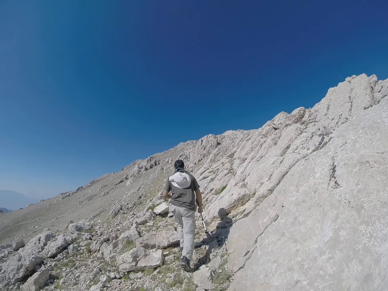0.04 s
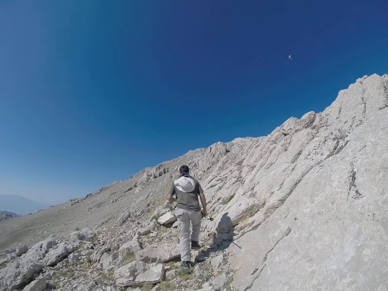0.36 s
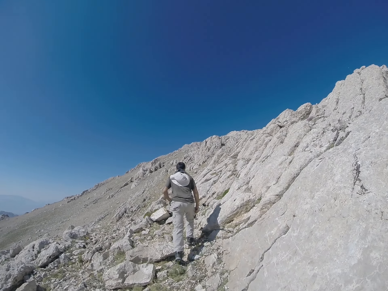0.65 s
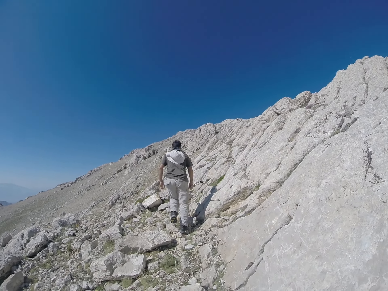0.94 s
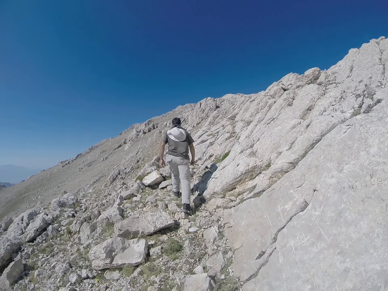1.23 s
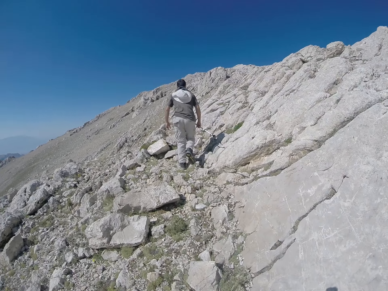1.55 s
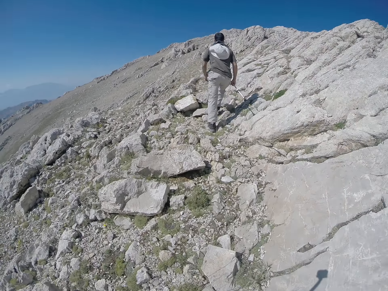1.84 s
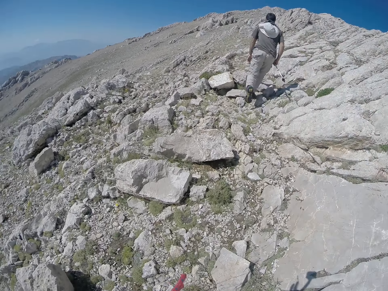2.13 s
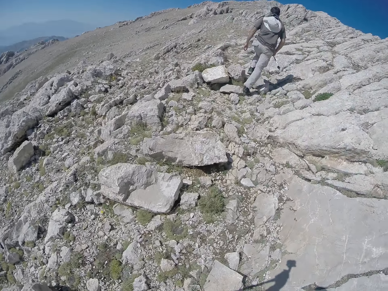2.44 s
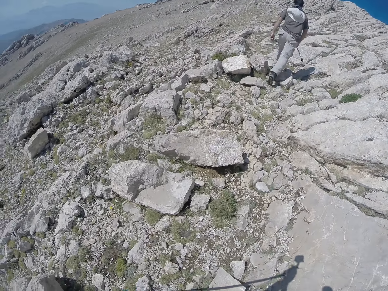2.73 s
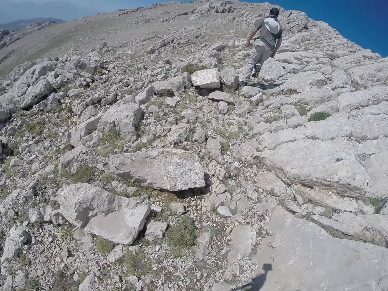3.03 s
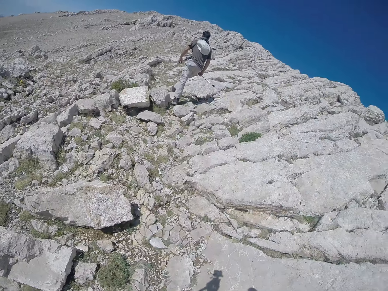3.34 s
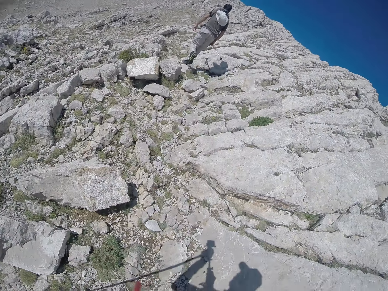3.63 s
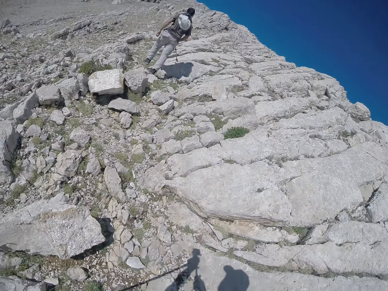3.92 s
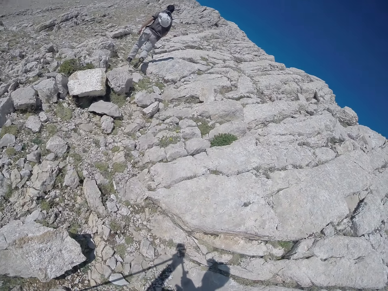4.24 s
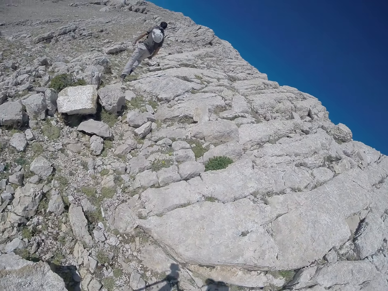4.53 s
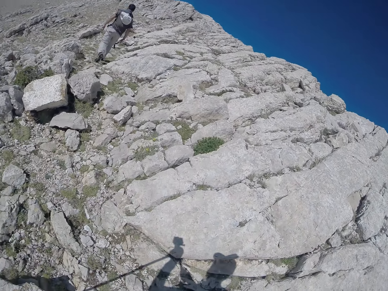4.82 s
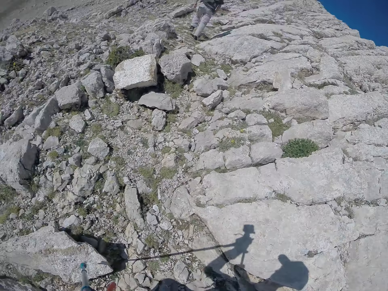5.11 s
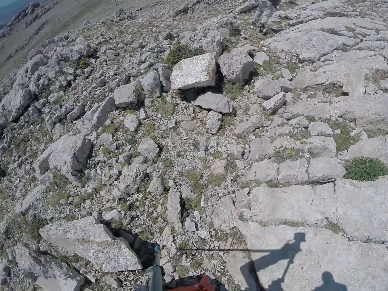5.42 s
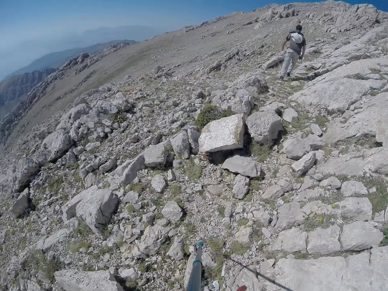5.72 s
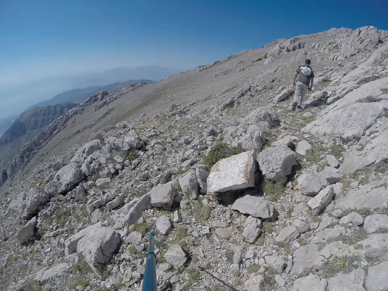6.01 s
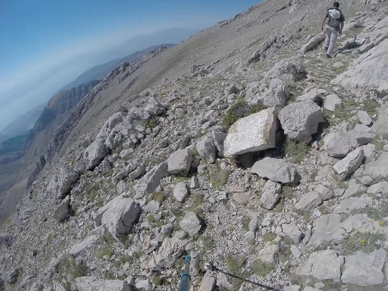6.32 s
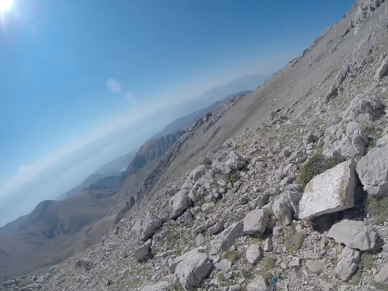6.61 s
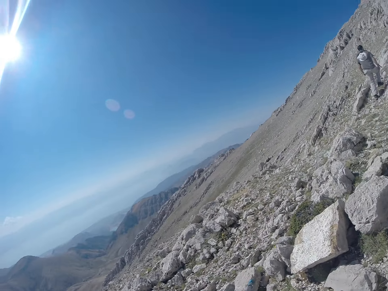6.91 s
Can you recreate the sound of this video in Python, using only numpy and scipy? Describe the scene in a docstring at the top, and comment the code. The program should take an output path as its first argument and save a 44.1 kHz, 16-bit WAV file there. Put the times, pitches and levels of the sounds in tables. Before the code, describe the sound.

Uneven footsteps clack and scrape on stones and gravel, with pole taps and soft gusts rumbling on the microphone.

```python
"""Loose limestone knocks under a hiker's boots on a high ridge, and a pole taps the rock.
Thin slabs clink and stray pebbles tumble; between the knocks, soles and gear scrape and grit crunches.
Knocks and scrapes ring through the case of a small camera worn on the body.
Gusts buffet its microphone over a faint hiss."""
import sys
import numpy as np
from scipy import signal
from scipy.fft import rfft, irfft
from scipy.io import wavfile

SR = 44100
rng = np.random.default_rng(int(sys.argv[2]) if len(sys.argv) > 2 else 0)


def int16_out(signal):
    """Quantize to a 16-bit WAV file."""
    q = np.round(np.clip(np.atleast_2d(signal).T, -1, 1) * 32767)
    wavfile.write(sys.argv[1], SR, q.astype(np.int16))


N = 315756
GRIT_FROM_HZ, TREBLE_FROM_HZ = 821, 3040   # low edges of clack and grit, and of snap and dust


def knocks(even_thud_hz=622, even_clack_hz=1830, hardness_range_db=17):
    """Stone and pole contacts: the harder the hit, the higher it rings, up to a soft limit."""
    # hits on rock: (time [s], thud level [dB], hardness = clack over thud [dB], snap over thud [dB],
    # crush decay [s])
    hits = [(1.088, -42.5, -15, -41, 0.0014), (1.1905, -34, -22, -43, 0.0027),
            (1.299, -37, -27, -36, 0.0018), (1.6917, -40, -10, -17, 0.00077),
            (1.741, -26, -0.5, -40, 0.0017), (1.7896, -20.5, -6, -6.5, 0.0088),
            (1.9363, -19, 0.5, -44, 0.0033), (1.972, -25.5, -33, -8.5, 0.0036),
            (2.257, -30.5, -26, -33, .002), (2.3549, -25.5, 0, -27, 0.0015), (2.3639, -27, -5, -11, 0.0035),
            (2.3782, -12, -2, -46, 0.0031), (2.5711, -32, -6.5, -33, 0.0016),
            (2.5896, -10, -16, -43, 0.0019), (2.6115, -36, -6.5, -24, 0.00091),
            (2.639, -37.5, -4, -28, 0.0018), (2.707, -41.5, -13, -21, 0.0022),
            (2.7204, -42, -10, -22, 0.0022), (2.7362, -38.5, -9, -20, 0.0013),
            (2.8928, -40, -12, -37, .0015), (3.0554, -33, -0.5, -14, 0.00054),
            (3.0734, -33.5, -8, -16, 0.0011), (3.1173, -25, -0.5, -9, 0.002),
            (3.1637, -21.5, -11, -24, 0.0021), (3.2397, -20.5, -20, -31, 0.0066),
            (3.277, -34.5, -8, -31, .002), (3.3278, -24, -1.5, -11, .007),
            (3.513, -11.5, -2.5, -30, 0.0017), (3.6488, -31.5, 2.5, -8.5, 0.0022),
            (3.7, -36.5, 1.5, -12, 0.00042), (3.7543, -30.5, -0.5, -21.5, 0.0043),
            (3.9096, -27, -4, -51, 0.0034), (4.0184, -12.5, -6.5, -20.5, 0.0016),
            (4.1428, -23, -1.5, -19.5, 0.0025), (4.185, -26.5, -13, -33, .002),
            (4.2025, -24, 5.5, -11, 0.00085), (4.218, -11, -12, -44, 0.00015),
            (4.3096, -32.5, 0, -11.5, 0.0014), (4.362, -29, -0.5, -16, 0.0025),
            (4.531, -39, -0.5, -26, 0.0099), (4.6668, -30, 0, -10, .002), (4.7397, -20.5, 0, -12, 0.002),
            (4.7663, -24.5, -8, -20, .002), (4.7989, -32.5, 5.5, -33, 0.005),
            (4.8319, -29.5, -2, -12, 0.0017), (4.8791, -31, -0.5, -7.5, 0.0016),
            (4.9098, -29.5, -5, -25, 0.009), (4.9947, -22, -7, -27, 0.0018),
            (5.0128, -18.5, -9.5, -31, 0.0018), (5.0455, -26, -28, -34, 0.0057),
            (5.0661, -25.5, -4, -19, 0.00033), (5.0925, -21, -11, -27, 0.002),
            (5.1079, -19.5, -12, -25, 0.00042), (5.1833, -39, 1.5, -6.5, 0.0014),
            (5.2679, -21, 1, -7, 0.0095), (5.2745, -19, -9, -8, 0.006), (5.3058, -34, 11.5, -4, .009),
            (5.4588, -31.5, -2, -10, 0.0071), (5.7201, -32, 0, -36, 0.00033),
            (5.7505, -25, -22, -35, 0.0023), (5.7693, -29, -36, -24, 0.0016),
            (5.7936, -27, 0.5, -12, 0.0016), (5.8861, -25, -11.5, -36, 0.0027),
            (5.8944, -21, -17, -44, 0.0021), (6.062, -33, -1.5, -31, 0.0018),
            (6.1149, -20, -37, -37, 0.0039), (6.2712, -32, 13.5, 6.5, 0.0009),
            (6.286, -15, 0, -18.5, 0.0009), (6.3067, -22.5, -11, -11, 0.0028),
            (6.3344, -16, -4.5, -11.5, 0.0019), (6.3822, -26.5, -4, -22, .002),
            (6.4158, -28, -2, -18, 0.0064), (6.5075, -18.5, 1, -12.5, .003),
            (6.6281, -19.5, -12.5, -22.5, 0.0081), (6.8384, -18, -6.5, -20, 0.0046),
            (6.9884, -26, -3, -19, 0.0031), (7.0102, -9, 0, -9.5, 0.0019), (7.0343, -26, 0.5, -18, .0007)]
    out = np.zeros(N + SR)
    for s, db, hardness_db, snap_db, crush_s in list(hits) + stray_pebbles():
        lift_db = hardness_range_db * np.tanh(hardness_db / hardness_range_db)
        thud_hz = even_thud_hz * 2 ** (0.09 * lift_db)
        clack_hz = even_clack_hz * 2 ** (0.62 * lift_db)
        sound = knock(db, thud_hz, db + hardness_db, clack_hz, db + snap_db, crush_s)
        at = int(s * SR)
        out[at:at + len(sound)] += sound
    return out[:N]


def knock(thud_db, thud_hz, clack_db, clack_hz, snap_db, crush_s, thud_width_hz=380, clack_width_hz=1100,
          crumble=0.43, push_share=0.4, rise_s=0.0005, scatter_s=0.0094, case_share=0.83):
    """One contact: a hard push, a burst of crushed grit, then faint scatter off the rocks around."""
    t = np.arange(SR // 8) / SR
    grit, scatter = rng.standard_normal((2, len(t)))
    push = (t == 0) * 1.
    crush = grit * (1 - np.exp(-t / rise_s)) * np.exp(-t / crush_s)
    crush /= np.sqrt(np.sum(crush ** 2))
    scatter = from_db(-33) / 2 * cut(scatter, "low", 2200, order=1) * np.exp(-t / scatter_s)
    contact = push_share * push + crush + scatter
    contact = (1 - case_share) * contact + case_share * case(contact)
    # the heavy stone answers the push with a few slow cycles, its edges with the faster clack
    thud = resonate(push + crumble * contact + scatter, thud_hz, thud_width_hz)
    thud = resonate(thud, thud_hz, 2 * thud_width_hz)
    thud = cut(cut(thud, "low", 688, order=3), "high", 360, order=3)
    clack = cut(resonate(contact, clack_hz, clack_width_hz), "band", [GRIT_FROM_HZ, 3150], order=4)
    snap = treble(contact, muffle_hz=3440, top_hz=8950)
    body = SR // 100   # the first 10 ms set each layer's level
    return sum(from_db(db) * part / np.sqrt(np.mean(part[:body] ** 2))
               for db, part in [(thud_db, thud), (clack_db, clack), (snap_db, snap)])


def stray_pebbles(count=80, from_s=2.35, over_rub_db=2, still_db=-53, spread_db=3,
                  hardness_db=-12, snap_db=-30.5, crush_s=0.0021):
    """Small hits at chance moments once the boots are on loose ground, louder while a sole drags."""
    moments = np.interp(np.arange(count) + rng.random(count), [0, count], [from_s, (N - 1) / SR])
    rub = drag_gains()[0][(moments * SR).astype(int)]
    levels_db = 20 * np.log10(np.hypot(rub * from_db(over_rub_db), from_db(still_db)))
    chance_db = spread_db * np.clip(rng.standard_normal((count, 2)), -2, 2)
    return [(s, db + size, hardness_db + edge, snap_db + edge, crush_s)
            for s, db, (size, edge) in zip(moments, levels_db, chance_db)]


def clinks(upper_ratio=1.15, upper_db=-8, rise_s=0.0005):
    """A thin slab rings with one clear note and a shorter mode just above it."""
    # thin loose stones: (time [s], level [dB], pitch [Hz], ring time to -60 dB [s])
    slabs = [(0.2317, -28.5, 1250, 0.0081), (1.19, -27, 1090, 0.0054), (6.4486, -9, 1170, 0.025),
             (6.487, -15, 1200, 0.045), (6.9582, -23.5, 1170, 0.026), (6.9674, -33.5, 1170, 0.017)]
    out = np.zeros(N)
    for s, db, hz, t60 in slabs:
        at = int(s * SR)
        t = np.arange(min(N - at, SR // 4)) / SR
        fade = from_db(-60 * t / t60)
        phase = 2 * np.pi * hz * t
        note = fade * np.sin(phase) + from_db(upper_db) * fade ** 2 * np.sin(upper_ratio * phase)
        out[at:at + len(t)] += from_db(db) * (1 - np.exp(-t / rise_s)) * note
    return out


def scrapes(rubbing_share=1.5, dust_grain_share=0.36, judder_db=2.5):
    """Soles and gear drag: pebbles crunch low down, fine dust hisses on top, and the drag judders."""
    rub_gain, grit_gain, hiss_gain = drag_gains()
    rubbing, dust = rng.standard_normal((2, N))
    coarse = case(pebbles(per_s=2000, spread_db=4.0, sharpness=9.3) + rubbing_share * rubbing)
    fine = case(dust + dust_grain_share * slips(per_s=820, spread_db=7.5))
    rub = rms_one(cut(cut(coarse, "high", 410), "low", 633, order=4))
    grit = rms_one(cut(coarse, "band", [GRIT_FROM_HZ, 3550], order=6))
    hiss = rms_one(treble(fine, muffle_hz=3300, top_hz=9200))
    return (rub_gain * rub + grit_gain * grit + hiss_gain * hiss) * from_db(judder_db * drift(70))


def drag_gains():
    """Envelopes of the hollow rub, the grit and the dust as the soles drag."""
    # drags over gravel: (time [s], hold [s], grit level [dB], rub over grit [dB], dust over grit [dB])
    drags = [(0.88, 0.012, -68, 8, 4), (0.96, 0.016, -66, 21, 1), (1.802, 0.0089, -34, 8, -12),
             (1.845, 0.25, -45, 2.5, -26), (1.952, 0.042, -35, 5.5, -35), (1.986, 0.026, -40, 9, -17),
             (2.415, 0.014, -29.5, 4.5, -16.5), (2.513, .1, -54, 9, -18), (2.987, 0.015, -56, 8, -11),
             (3.068, 0.19, -43.5, -2, -13), (3.122, 0.066, -37.5, -18, -1.5), (3.347, .1, -35, -9, -4),
             (3.434, 0.11, -31.5, -6, -10), (3.543, 0.091, -45.5, 3, -14), (3.68, 0.28, -48, 1.5, -16),
             (3.925, 0.36, -44, 1.5, -30), (3.972, 0.13, -34, -0.5, -19.5),
             (4.243, 0.0089, -36, -15, -20.5), (4.277, 0.14, -56.5, 7, -11), (4.747, 0.1, -41.5, 8.5, -27),
             (4.905, .09, -39.5, 3, -14.5), (5.036, 0.22, -45, 2, -14), (5.215, 0.049, -34.5, -12, -9),
             (5.264, 0.013, -29, -0.5, -4.5), (5.311, 0.015, -30.5, 0, -8.5), (5.36, 0.3, -46, -4.5, -13),
             (5.634, 0.23, -44.5, 8, -14), (5.911, 0.091, -30, 0.5, -15), (6.075, 0.42, -43.5, 5, -18),
             (6.128, 0.095, -36.5, 4, -14), (6.264, 0.034, -32, 7, -20), (6.465, 0.068, -25.5, 3, -23),
             (6.505, 0.069, -25, 3.5, -7), (6.589, 0.049, -34.5, -2, -15), (6.688, 0.11, -37, 1, -11),
             (6.848, 0.069, -41.5, 8, -12), (6.967, 0.023, -42.5, -1, -13)]
    s, hold, db, rub_db, dust_db = np.transpose(drags)
    return [swells(s, hold, db + over_db, attack_s=0.0091, release_s=0.01)
            for over_db in (rub_db, 0, dust_db)]


def pebbles(per_s, spread_db, sharpness, count=18):
    """Each slip rings one pebble for a few cycles; big ones low, small ones high."""
    clicks = slips(per_s, spread_db)
    struck = rng.integers(0, count, N)
    return rms_one(sum(resonate(clicks * (struck == k) + 1e-18, hz, hz / sharpness) / np.sqrt(hz)
                       for k, hz in enumerate(np.geomspace(400, 3400, count))))


def slips(per_s, spread_db):
    """Grains of uneven size slip at random moments, one click each."""
    sizes = from_db(spread_db * np.minimum(rng.exponential(1, N), 3)) * rng.choice([-1, 1], N)
    return rms_one(sizes * (rng.random(N) < per_s / SR))


def case(x):
    """Each resonance of the camera case lifts its own narrow band and rings briefly."""
    # case resonances: (pitch [Hz], width [Hz], boost [dB])
    modes = [(654, 227, 13), (1170, 430, 10), (1702, 400, 9), (2363, 564, 20), (2923, 94, 6),
             (3670, 120, 6), (4543, 630, 12), (5900, 820, 2.5), (7220, 400, 11.5), (9300, 400, 3.5)]
    for hz, width_hz, boost_db in modes:
        x = x + (from_db(boost_db) - 1) * resonate(x, hz, width_hz / from_db(boost_db / 2))
    return x


def treble(x, muffle_hz, top_hz):
    """The highs, muffled by the wall of the case."""
    highs = cut(x, "high", TREBLE_FROM_HZ, order=5)
    return cut(cut(highs, "low", muffle_hz, order=1), "low", top_hz, order=3)


def wind(flutter_db=6.0, steady_share=0.4, case_share=0.41, buffet_db=-3.5, buffet_growth=1.199):
    """Eddies rumble on the microphone; the sharper buffets also stir the case's lowest resonance."""
    # gusts: (time [s], hold [s], rumble level [dB])
    gusts = [(0.014, 0.16, -9.5), (0.277, 0.1, -11.5), (0.45, 0.12, -31), (0.742, 0.071, -22.5),
             (1.266, 0.043, -30.5), (1.547, 0.044, -17.5), (1.643, 0.018, -12.5), (1.76, 0.11, -27.5),
             (1.924, 0.29, -26.5), (2.19, 0.066, -18.5), (2.31, 0.054, -22), (3.12, 0.26, -37.5),
             (3.349, 0.18, -27.5), (3.622, 0.074, -26.5), (3.784, .1, -23), (3.897, 0.11, -27),
             (4.05, 0.14, -25.5), (4.685, 0.22, -30), (4.896, 0.12, -40), (5.273, 0.25, -31.5),
             (5.518, 0.17, -23.5), (5.88, 0.027, -23.5), (6.03, 0.13, -28), (6.834, 0.027, -32)]
    # the breeze under the gusts: (time [s], rumble level [dB])
    breeze = [(0, -34), (.7, -33), (1.0, -48), (1.45, -34.5), (2.6, -37), (2.9, -40), (4.35, -41),
              (4.55, -33.5), (6.3, -39), (6.65, -45.5), (7.15, -43)]
    flow = np.hypot(swells(*np.transpose(gusts), attack_s=0.025, release_s=0.034), fader(breeze))
    slow, fast = rng.standard_normal((2, N))
    rumble = rms_one(cut(cut(slow, "high", 19.5), "low", 93.2, order=3))
    buffet = cut(cut(fast, "high", 112.0, order=3), "low", 123.6)
    # buffets ride on the crests of the eddies, so they flutter
    buffet = buffet * (steady_share + np.abs(rumble)) * from_db(flutter_db * np.tanh(drift(30)))
    buffet = (1 - case_share) * buffet + case_share * case(buffet)
    buffet = rms_one(cut(buffet, "low", 722, order=5))
    # as the flow rises, buffeting grows faster than the rumble
    return flow * rumble + from_db(buffet_db) * flow ** buffet_growth * buffet


def background():
    """A faint hiss with the colour of the case; it dips after a few hard knocks and creeps back."""
    # hiss colour: (frequency [Hz], relative level [dB])
    spectrum = [(200, -10), (420, -10.5), (650, 2), (900, -13.5), (1500, -20), (2200, -21.5), (3200, -29.5),
                (4700, -31), (5050, -24), (5400, -30.5), (7300, -34), (8600, -41), (10200, -34),
                (15000, -49)]
    # hiss fader ride: (time [s], level [dB])
    ride = [(0, -49.5), (2.36, -46.5), (2.46, -63), (2.95, -60.5), (3.5, -55), (4.2, -50), (4.3, -63),
            (4.65, -54), (5.2, -55), (6.3, -47), (7.0, -53), (7.06, -59.5)]
    hz, db = np.transpose(spectrum)
    bins = np.maximum(np.fft.rfftfreq(N, 1 / SR), 1)
    colour = from_db(np.interp(np.log(bins), np.log(hz), db))
    return fader(ride) * rms_one(irfft(rfft(rng.standard_normal(N)) * colour, N))


def swells(starts, holds, levels_db, attack_s, release_s):
    """Gain of overlapping swells: each is full at its start, holds and dies away; their powers add."""
    t = np.arange(0, N / SR, .001)
    early = np.maximum(starts[:, None] - t, 0)
    late = np.maximum(t - (starts + holds)[:, None], 0)
    gains = from_db(levels_db)[:, None] * np.exp(-early / attack_s - late / release_s)
    return np.interp(np.arange(N) / SR, t, np.sqrt(np.sum(gains ** 2, axis=0)))


def fader(points):
    """One gain per sample from (time [s], level [dB]) points."""
    return from_db(np.interp(np.arange(N) / SR, *np.transpose(points)))


def drift(rate):
    """A random wander at unit rms, changing about rate times a second."""
    knots = rng.standard_normal(4096)
    return rms_one(np.interp(np.arange(N) / SR * rate, np.arange(len(knots)), knots))


def resonate(x, hz, width_hz):
    """A two-pole resonance with gain 1 at its peak."""
    r = np.exp(-np.pi * width_hz / SR)
    feedback = [1, -2 * r * np.cos(2 * np.pi * hz / SR), r * r]
    return signal.lfilter(np.array([1, 0, -1]) * (1 - r * r) / 2, feedback, x)


def cut(x, kind, hz, order=2):
    """Butterworth low-, high- or band-pass."""
    return signal.sosfilt(signal.butter(order, hz, kind, fs=SR, output="sos"), x)


def from_db(db):
    """Decibels to gain."""
    return 10 ** (np.asarray(db) / 20)


def rms_one(x):
    """Scale to unit rms."""
    return x / np.sqrt(np.mean(x ** 2) + 1e-20)


def scene():
    """Stones, scrapes, wind and hiss in open air, in mono."""
    return (knocks() + clinks() + scrapes() + wind() + background())[None]


def record(dry):
    """The loudest peaks overload softly, and a steep low-pass takes off the very top."""
    ceiling, cutoff_hz = 1.08, 15700
    squashed = dry / (1 + (dry / ceiling) ** 6) ** (1 / 6)
    return signal.sosfilt(signal.ellip(12, .1, 120, cutoff_hz, fs=SR, output="sos"), squashed)


dry = scene()
out = record(dry)
int16_out(out)
```